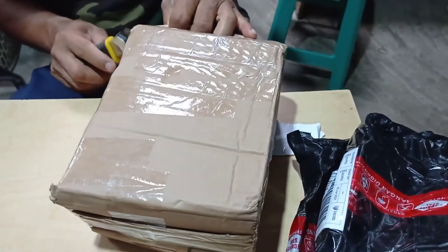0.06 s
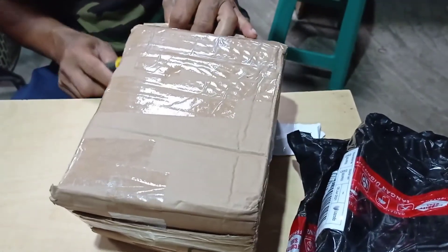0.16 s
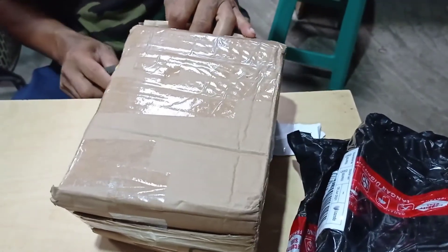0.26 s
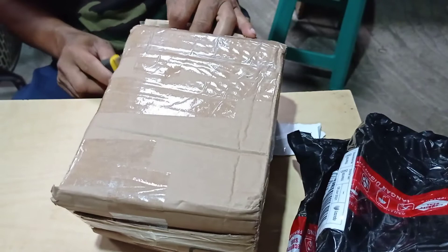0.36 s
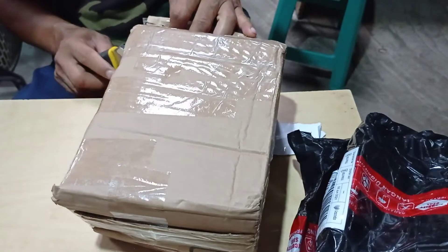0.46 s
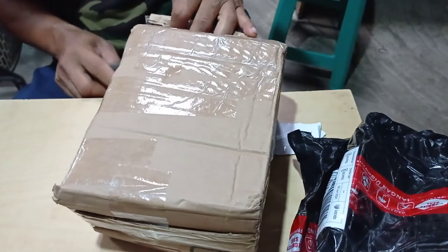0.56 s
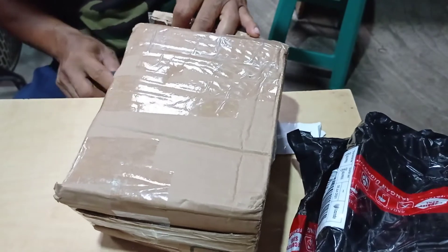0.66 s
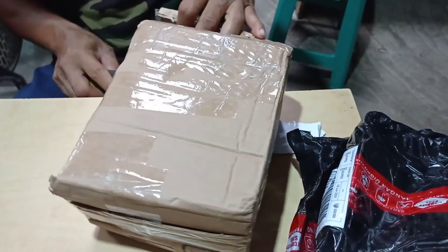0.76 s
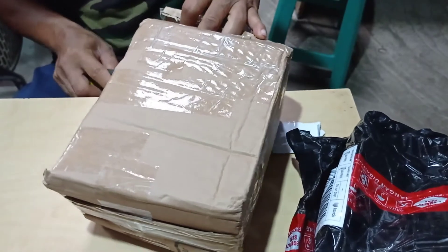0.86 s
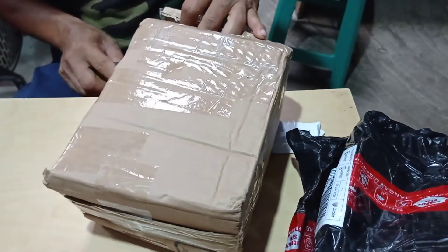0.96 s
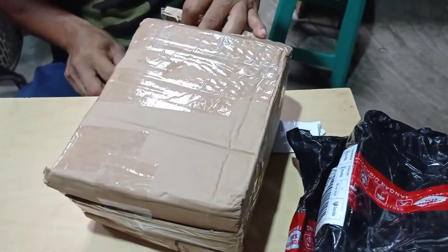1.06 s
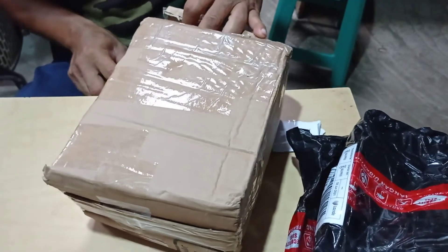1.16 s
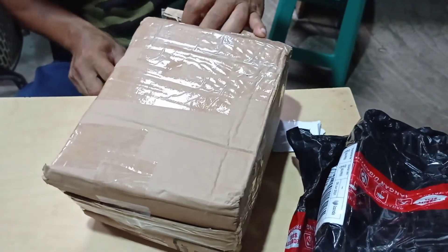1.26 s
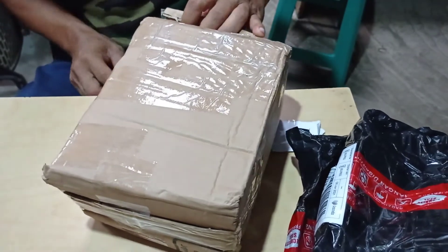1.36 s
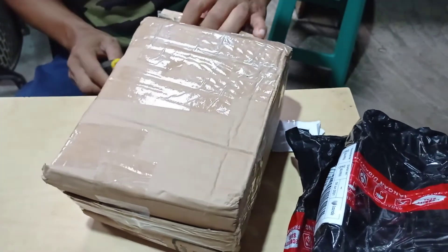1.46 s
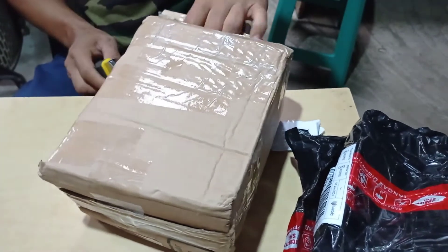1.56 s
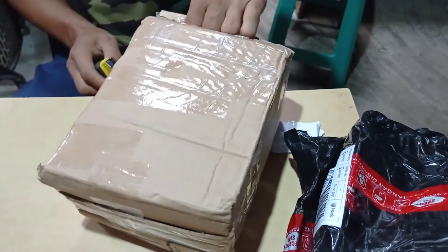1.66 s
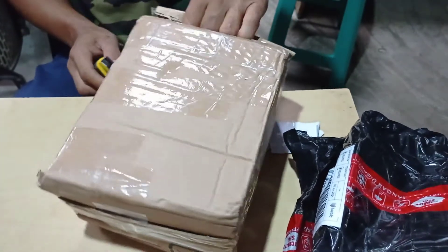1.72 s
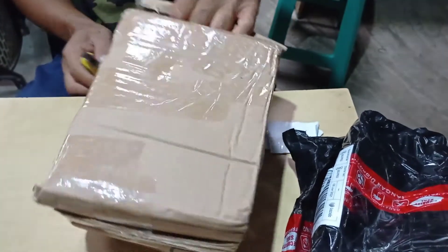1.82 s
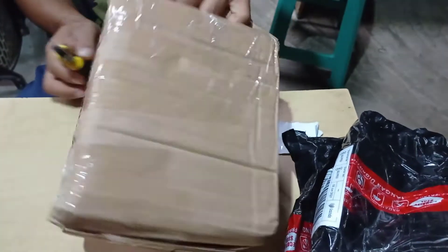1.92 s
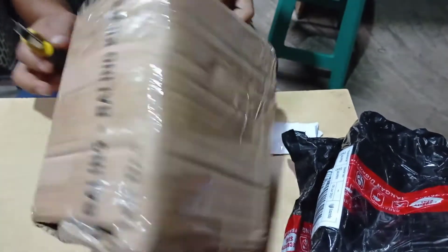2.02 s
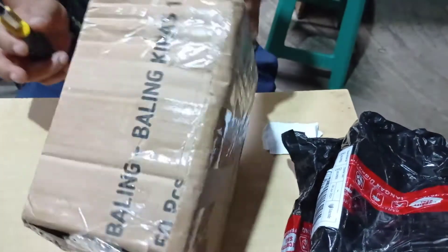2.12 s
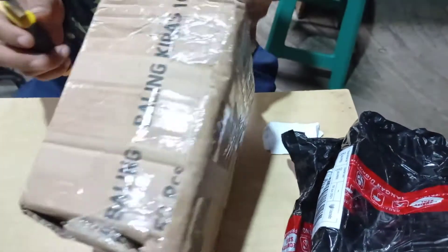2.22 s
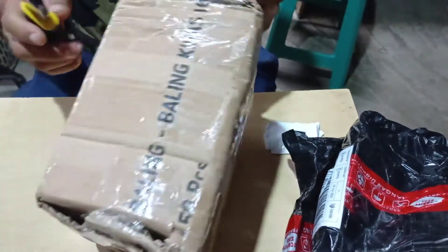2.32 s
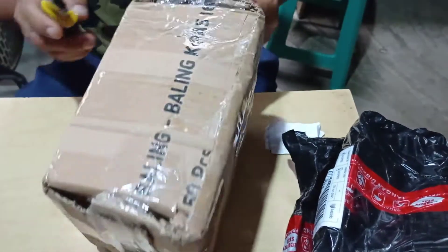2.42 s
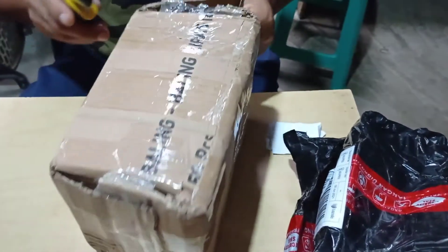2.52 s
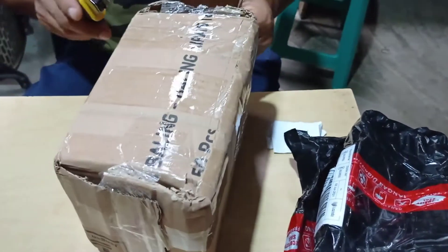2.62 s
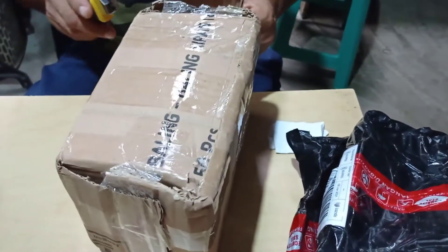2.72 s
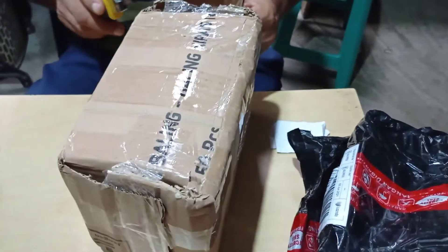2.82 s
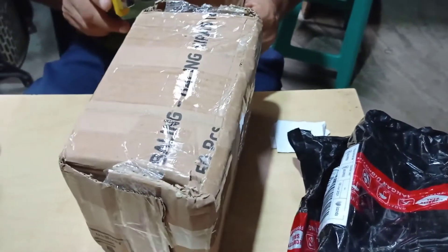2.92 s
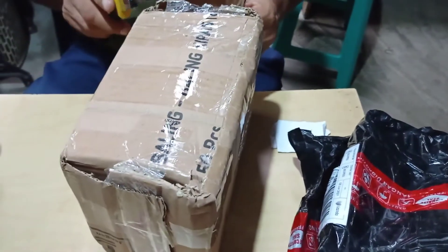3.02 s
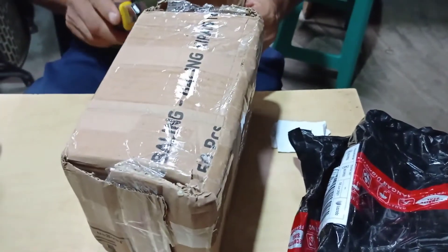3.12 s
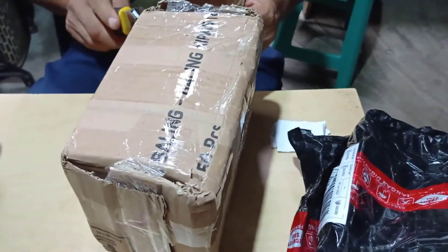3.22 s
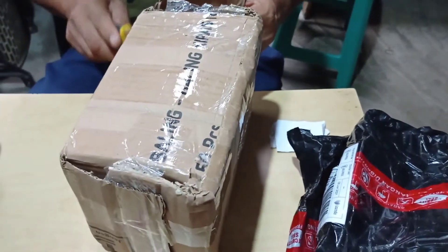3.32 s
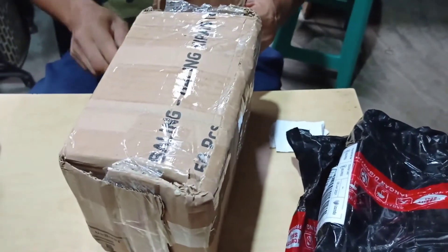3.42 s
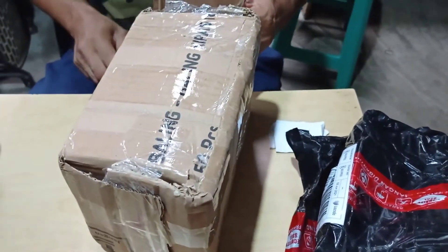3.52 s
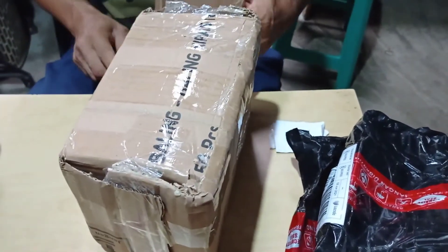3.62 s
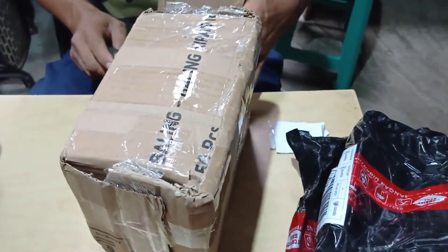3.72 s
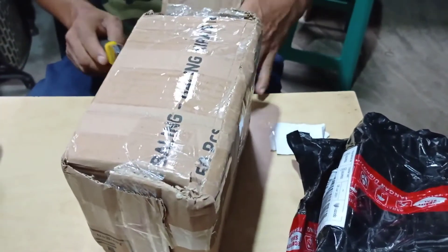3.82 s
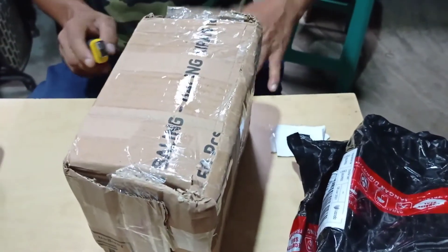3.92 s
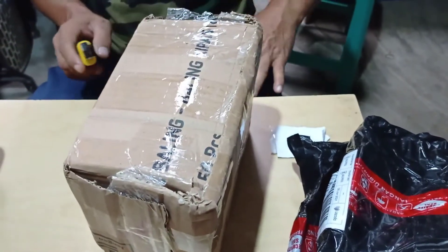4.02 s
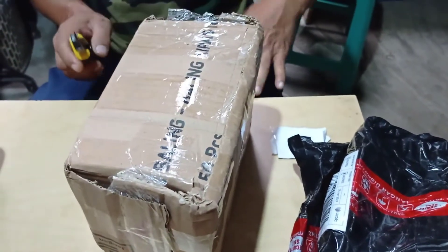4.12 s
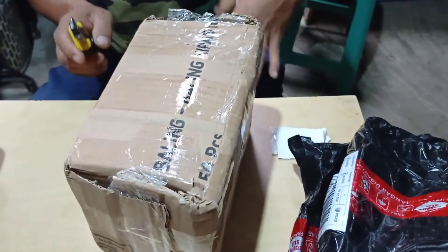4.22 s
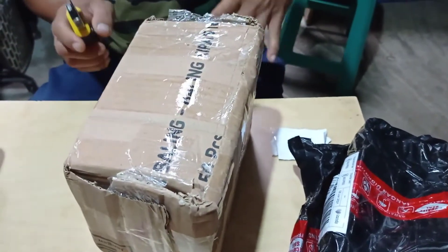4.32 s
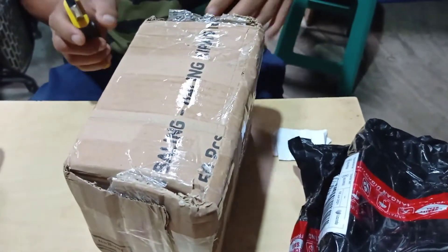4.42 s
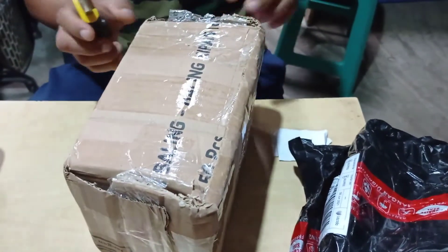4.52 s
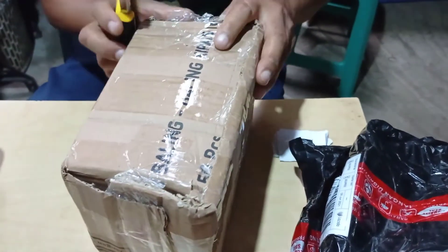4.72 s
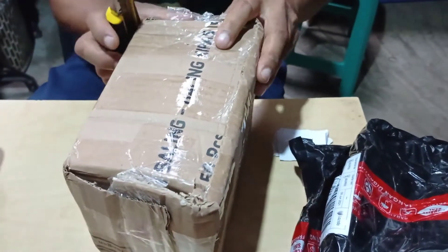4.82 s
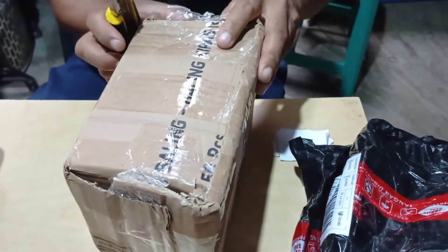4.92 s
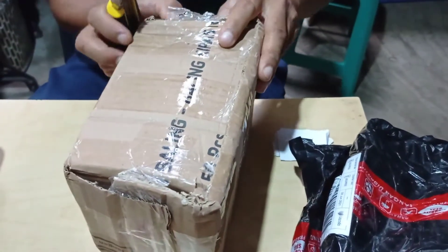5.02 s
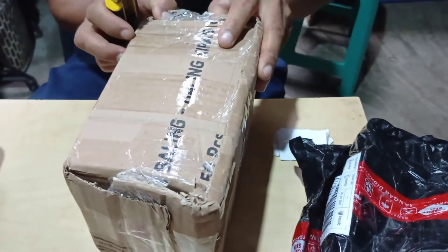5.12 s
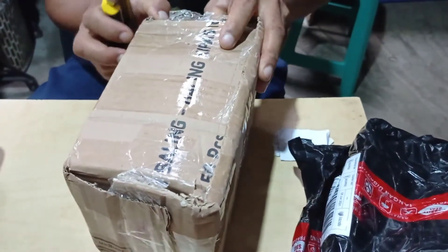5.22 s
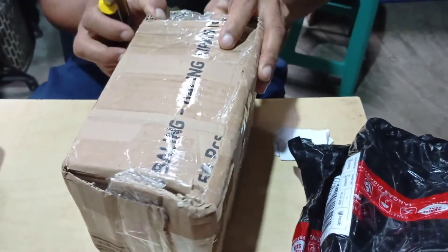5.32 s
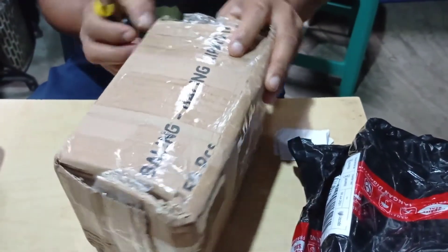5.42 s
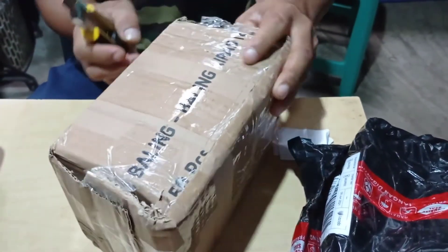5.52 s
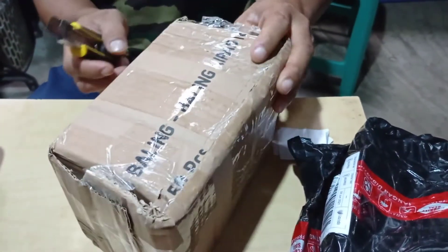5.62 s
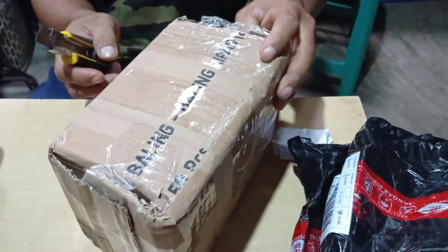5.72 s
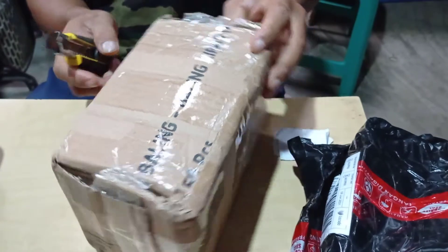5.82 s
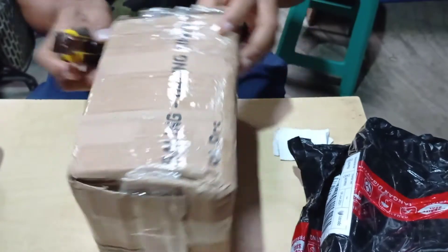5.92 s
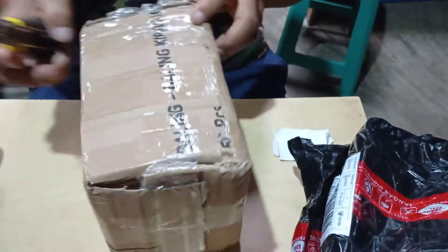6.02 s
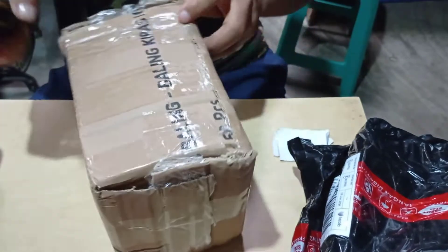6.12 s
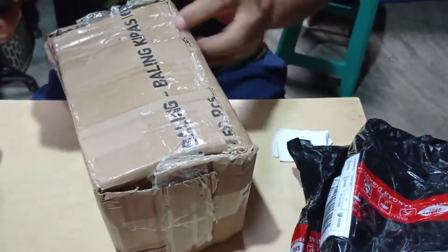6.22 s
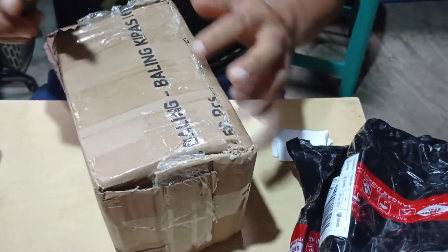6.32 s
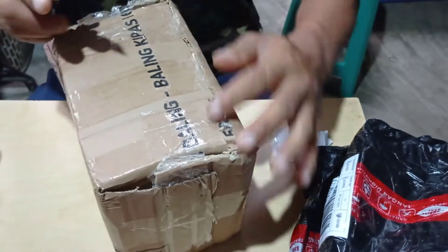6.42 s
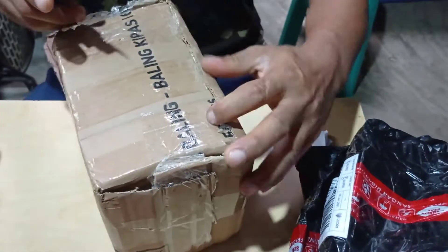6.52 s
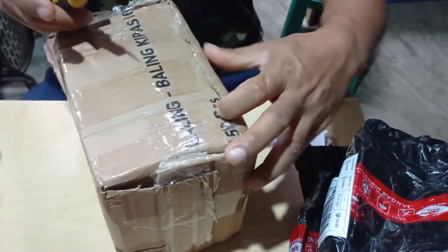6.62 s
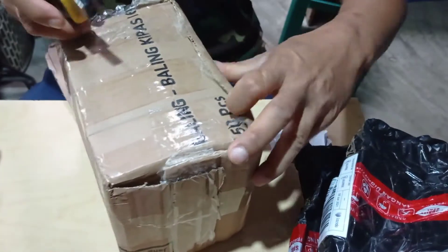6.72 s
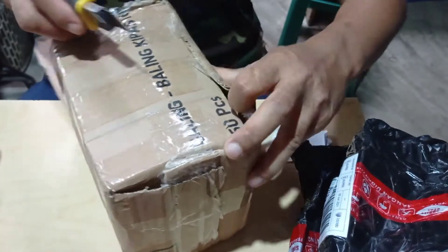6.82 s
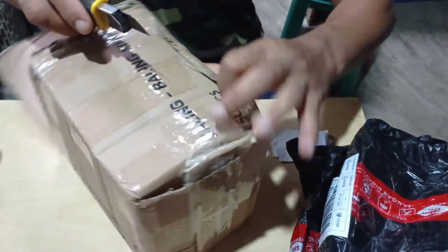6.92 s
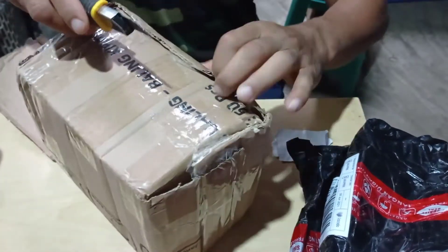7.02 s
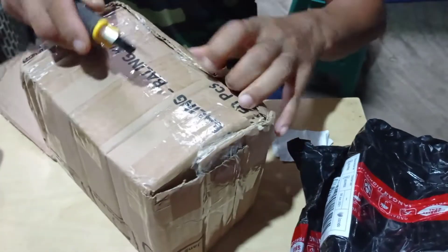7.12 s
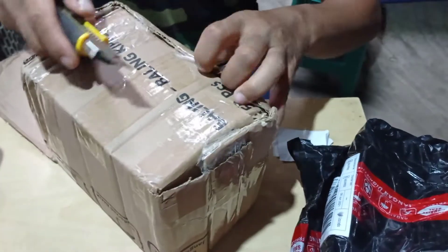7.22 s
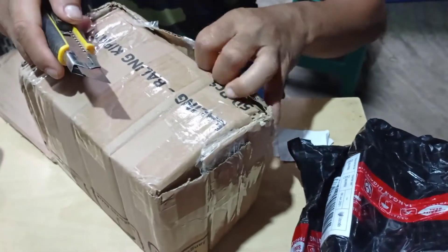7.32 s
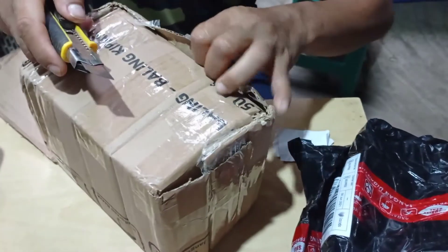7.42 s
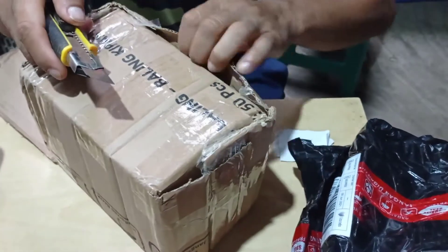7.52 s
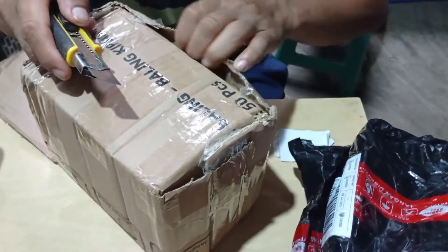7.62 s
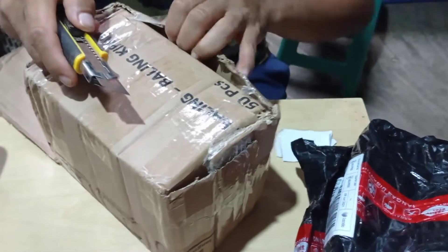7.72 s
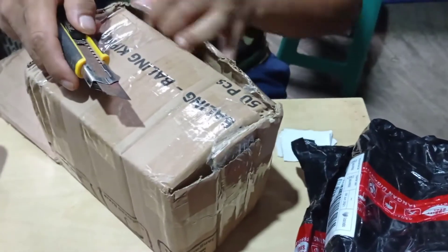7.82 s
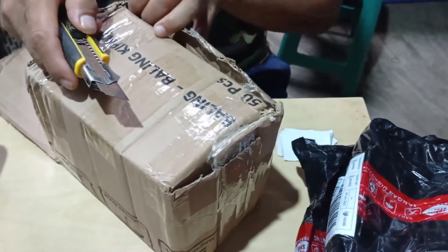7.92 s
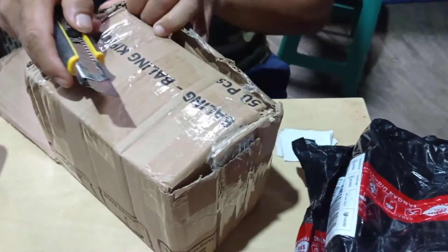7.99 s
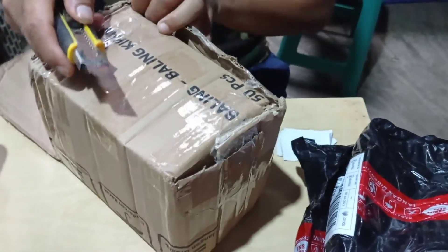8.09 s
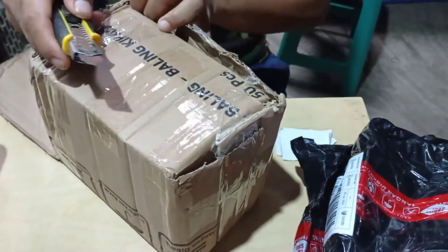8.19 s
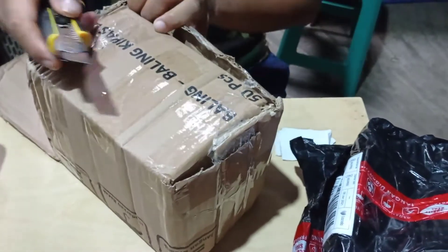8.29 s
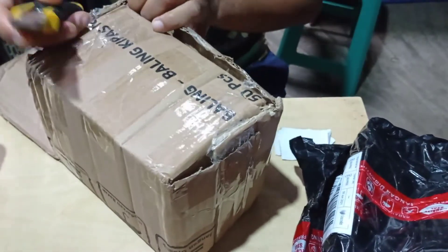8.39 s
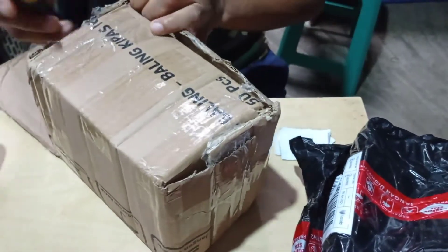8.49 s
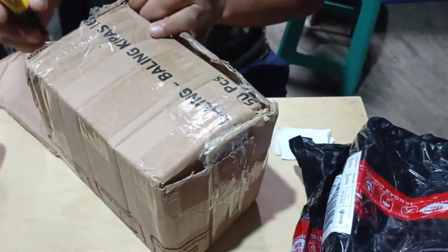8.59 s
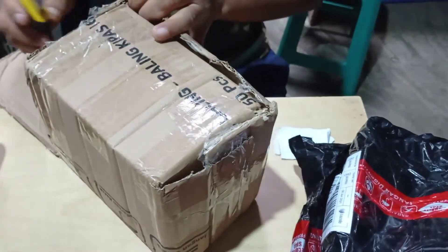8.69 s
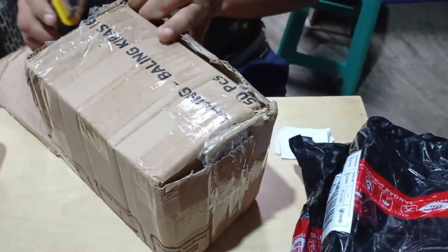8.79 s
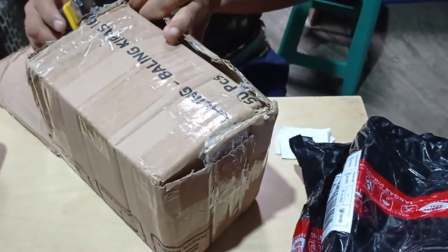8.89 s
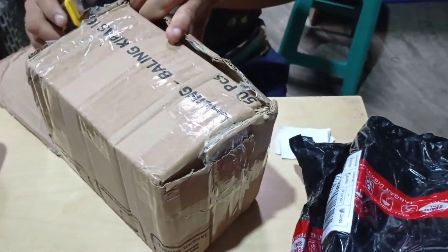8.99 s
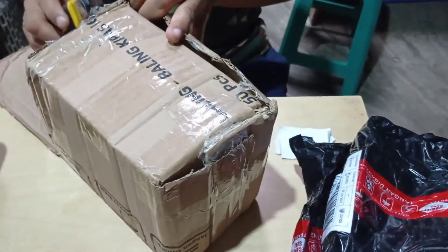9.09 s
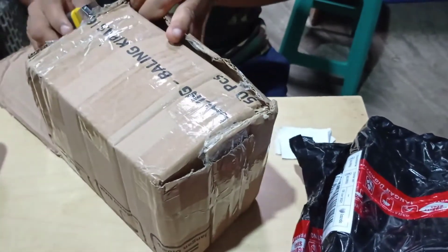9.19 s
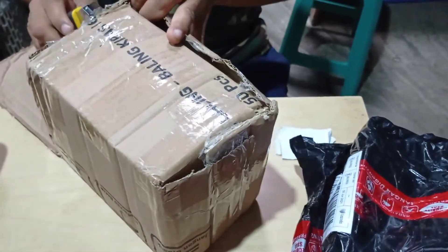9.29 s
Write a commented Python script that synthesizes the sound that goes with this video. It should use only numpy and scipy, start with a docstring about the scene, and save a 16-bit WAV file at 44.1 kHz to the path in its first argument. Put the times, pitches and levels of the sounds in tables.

```python
"""Cutting open a wrapped box

A taped, film-wrapped cardboard box is turned on a table and worked open with a utility knife.
Rubbing is filtered noise and random slips; creases, tape and card give way in short noise bursts.
Damped swings make the knocks; harmonics of the slip rate make the blade's groan.
A small hard room answers each sound with decaying noise, over a quiet floor with a thin whine."""
import sys
import numpy as np
from scipy import signal
from scipy.fft import rfft, irfft
from scipy.io import wavfile
from scipy.ndimage import uniform_filter1d

SR = 44100
rng = np.random.default_rng(int(sys.argv[2]) if len(sys.argv) > 2 else 0)


def unload_audio(sound):
    """Save the sound as a 16-bit wav file, at the path given as the first command line argument."""
    columns = np.transpose(np.atleast_2d(sound))
    # keep every value between -1 and 1, then stretch to whole-number steps
    steps = np.round(np.clip(columns, -1, 1) * 32767)
    wavfile.write(sys.argv[1], SR, steps.astype(np.int16))


N = 412335


def amp(db):
    """Decibels to gain."""
    return 10 ** (np.asarray(db) / 20)


def evened(x):
    """Scales to rms 1."""
    return x / np.sqrt(np.mean(x ** 2) + 1e-20)


def read(points, hz, column=1):
    """Reads a table on a log-frequency axis."""
    rows = np.array(points)
    return np.interp(np.log(hz + 1), np.log(rows[:, 0] + 1), rows[:, column])


def add(mix, start_s, sound):
    """Mixes a sound in at a time."""
    part = mix[max(round(start_s * SR), 0):][:len(sound)]
    part += sound[:len(part)]


def response(points, size=2048):
    """The causal, minimum-phase ring of a part that has this spectrum."""
    log_gain = np.log(amp(read(points, abs(np.fft.fftfreq(size, 1 / SR)))))
    spectrum = np.exp(np.conj(signal.hilbert(log_gain)))
    return np.fft.ifft(spectrum).real[:size // 2]


def through(x, ring):
    """Plays a force through a ring."""
    return signal.oaconvolve(x, ring)[:len(x)]


def resonate(x, hz, width_hz):
    """A one-pole complex resonance of gain 1."""
    pole = np.exp((2j * np.pi * hz - np.pi * width_hz) / SR)
    return 2 * signal.lfilter([1 - abs(pole)], [1, -pole], x).real


def resonate_twice(x, hz, width_hz):
    """Two equal resonances in series, for steeper skirts."""
    return resonate(resonate(x, hz, width_hz), hz, width_hz)


BLOW_S = .005  # a blow's level is its energy spread over this time


def blow(sound, db):
    """Gives one short sound its level."""
    return amp(db) * sound * np.sqrt(BLOW_S * SR / (np.sum(sound ** 2) + 1e-20))


def strokes(rows, column, attack_share=0.3, release_s=0.017):
    """Force of a series of strokes: each builds over a share of its length, holds and dies away."""
    out = np.zeros(N)
    for row in rows:
        start_s, length_s = row[:2]
        t = np.arange(0, length_s + 10 * release_s, 1 / SR)
        build = np.minimum(t / (attack_share * length_s), 1)
        release = np.exp(-np.maximum(t - length_s, 0) / release_s)
        add(out, start_s, amp(row[column]) * build * release)
    return out


# Spectrum of the floor. Each row: frequency in Hz, relative level in dB.
FLOOR_SPECTRUM = [(25, -15), (50, -2), (130, 3), (350, -2.5), (800, -16.5), (6200, -28.5), (13000, -50)]


def background(floor_db=-73.5, whine_db=-81.5, whine_hz=6130, width_hz=110):
    """Shaped noise makes the low floor; a narrow noise band makes a faint, fuzzy whine."""
    hz = np.fft.rfftfreq(N, 1 / SR)
    air, whine = rfft(rng.standard_normal((2, N)))
    air = irfft(air * amp(read(FLOOR_SPECTRUM, hz)), N)
    whine = irfft(whine / (1 + ((hz - whine_hz) / width_hz) ** 2), N)
    return amp(floor_db) * evened(air) + amp(whine_db) * evened(whine)


# The room's decay. Each row: frequency in Hz, t60 in seconds, relative tail energy in dB.
ROOM_DECAY = [(151, 0.36, 1.5), (497, 0.32, -7), (2800, 0.3, -3.5), (15040, 0.33, -10)]


def room(x, gap_s=.003, build_s=0.00092, count=12, return_db=-1.5):
    """Dense reflections die band by band; random tails crossfade evenly through the scene."""
    out, place = np.zeros(N), np.linspace(0, count - 1, N)
    for k in range(count):
        hz, t, z = signal.stft(rng.standard_normal(SR // 2), SR, nperseg=256)
        rate = np.log(1000) / read(ROOM_DECAY, hz)[:, None]
        level = amp(read(ROOM_DECAY, hz, column=2))[:, None]
        z = z * level * np.exp(-rate * t) * np.sqrt(2 * rate / SR)
        tail = signal.istft(z, SR, nperseg=256)[1]
        tail = tail * (1 - np.exp(-np.arange(len(tail)) / (SR * build_s)))
        share = np.sqrt(np.maximum(1 - abs(place - k), 0))
        add(out, gap_s, through(x * share, tail))
    return amp(return_db) * out


# Modes of hollow box and table top. Each row: frequency in Hz, t60 in seconds, gain in dB.
HOLLOW_MODES = [(145, 0.13, 3), (197.4, 0.19, 3.5), (352.2, 0.064, -6)]


def hollow(x):
    """The air in the box and the table under it ring on after every push."""
    return sum(amp(db) * resonate(x, hz, np.log(1000) / np.pi / t60_s) for hz, t60_s, db in HOLLOW_MODES)


# Faces the box is turned to; it hardly touches the table on the first turn.
# Each row: start in seconds, panel pitch in Hz, jolt and shake gain in dB, hollow middle gain in dB.
FACES = [(0, 334, -2.5, 2), (1.6, 386, -16, -4), (2.55, 304, -1, -1.5), (6.1, 471, -1, 1)]


def posed(column):
    """A gain that changes as the box is turned from face to face."""
    rows = np.array(FACES)
    return amp(rows[:, column])[np.searchsorted(rows[1:, 0], np.arange(N) / SR)]


def facing(x, low_hz=560, high_hz=1150):
    """The hollow middle of the sound is stronger or weaker with the face that is turned up."""
    band = signal.butter(N=2, Wn=[low_hz, high_hz], btype="band", fs=SR, output="sos")
    return x + (posed(column=3) - 1) * signal.sosfiltfilt(band, x)


def stroke(start_s, length_s):
    """One smooth stroke of the hand, from 0 up to 1 and back."""
    return np.sin(np.pi * np.clip((np.arange(N) / SR - start_s) / length_s, 0, 1))


# A palm slides evenly over taut film. Each row: start in seconds, length in seconds, peak sizzle in dB.
PALM_SLIDES = [(1.81, 0.15, -87), (3.334, 0.14, -54), (5.682, .46, -60)]


def sizzle(centre_hz=15000, width_hz=900):
    """Taut film sings at the top of hearing as it slides: a narrow noise band."""
    band = evened(resonate_twice(rng.standard_normal(N), centre_hz, 2 * width_hz))
    return band * sum(amp(db) * stroke(s, length_s) ** 2 for s, length_s, db in PALM_SLIDES)


def catching():
    """1 where the hand catches on creases, near 0 in the middle of an even slide."""
    return np.clip(1 - 0.96 * sum(stroke(s, length_s) for s, length_s, _ in PALM_SLIDES), 0, 1)


# The blade sticks and slips along the side. Each row: time in seconds, slips per second,
# relative groan level in dB, relative panel buzz level in dB, buzz pitch in Hz.
STICK_SLIP = [(0.34, 84, -51, -69, 370), (0.418, 77, -54, -61, 440), (0.57, 75, -54, -61, 510),
              (0.66, 58, -55.5, -60.5, 410), (0.76, 49.4, -57.5, -61.5, 510), (0.819, 50, -58, -71, 317),
              (0.86, 54, -54, -73, 316), (0.94, 49.6, -53.5, -73, 342), (1.015, 43, -67, -68, 481)]


def slip_turns():
    """Counts the slips of the blade through the long cut."""
    s, per_s = np.transpose(STICK_SLIP)[:2]
    return np.cumsum(np.interp(np.arange(N) / SR, s, per_s, left=0, right=0)) / SR


# How readily the side of the box sways. Each row: frequency in Hz, gain in dB.
SIDE_SWAY = [(50, -27.5), (75, -6.5), (105, -14.5), (150, 0), (210, -6), (550, -36)]


def groan(width_hz=55, waver_db=5.0, waver_step_s=.018, count=12):
    """Each slip tugs the side into a low, gliding groan; the panel buzzes at a pitch that moves."""
    s, per_s, groan_db, buzz_db, buzz_hz = np.transpose(STICK_SLIP)
    t, out = np.arange(s[0], s[-1], 1 / SR), np.zeros(N)
    turns = slip_turns()[round(s[0] * SR):][:len(t)]
    slip_hz = np.interp(t, s, per_s)
    cutting = np.minimum(10 * np.sin(np.linspace(0, np.pi, len(t))), 1)
    knots = np.arange(s[0], s[-1], waver_step_s)
    for k in range(1, count + 1):
        sway = amp(np.interp(t, s, groan_db) + read(SIDE_SWAY, k * slip_hz))
        detune = (k * slip_hz - np.interp(t, s, buzz_hz)) / width_hz
        buzz = amp(np.interp(t, s, buzz_db)) / (1 + detune ** 2)
        waver = evened(amp(waver_db * np.interp(t, knots, rng.standard_normal(len(knots)))))
        add(out, s[0], cutting * waver * (sway + buzz) * np.sin(2 * np.pi * k * turns))
    return out


# Ringing modes of the knife. Each row: frequency in Hz, relative level in dB.
BLADE_MODES = [(1090, -13), (2070, -2.5), (4730, 2.5), (7150, 3)]


def blade(x, width_hz=260):
    """The ring of the knife: each mode is a broad resonance followed by a fixed-width one."""
    return sum(amp(db) * evened(resonate(resonate(x, hz, hz / 8), hz, width_hz)) for hz, db in BLADE_MODES)


# The blade chatters late in the long cut. One row: start in seconds, length in seconds, relative level in dB.
BLADE_CHATTER = (.89, 0.11, -68.5)


def chatter(catch_s=0.0046):
    """Towards the end of the cut each slip also rings the thin blade, ever harder."""
    start_s, length_s, db = BLADE_CHATTER
    t = np.arange(0, length_s, 1 / SR)
    slips = np.diff(np.floor(slip_turns()), prepend=0)[round(start_s * SR):][:len(t)]
    catches = through(slips, np.exp(-t / catch_s)) * rng.standard_normal(len(t))
    out = np.zeros(N)
    add(out, start_s, amp(db) * evened(blade(catches * np.sqrt(t / length_s))))
    return out


# The knife shifts in the grip. Each row: start in seconds, length in seconds, relative level in dB.
GRIP_SHIFTS = [(4.348, 0.013, -58.5), (9.04, 0.038, -75), (9.118, 0.0074, -62)]


def knife(ring_gain=0.62):
    """The knife shifting in the grip: noise through the blade's ring and the film's spectrum."""
    noise = rng.standard_normal(N)
    scrape = evened(through(noise, response(FILM_SPECTRUM)))
    return strokes(GRIP_SHIFTS, column=2) * (ring_gain * evened(blade(noise)) + scrape)


# Dents in the card popping in or out. Each row: start in seconds, level in dB, pitch in Hz.
DENT_POPS = [(0.162, -32, 690), (0.286, -48.5, 1350), (0.312, -52.5, 1300), (1.277, -39.5, 1285),
             (1.954, -45, 1430), (3.137, -47, 1430), (3.547, -49.5, 1430), (4.196, -53, 2270),
             (8.982, -61, 1380)]


def dents(pop_s=.0015, damping=0.14, size=1024):
    """A dent pops with a short, hollow tick of its own pitch."""
    out, t = np.zeros(N), np.arange(size) / SR
    for (s, db, hz), grit in zip(DENT_POPS, rng.standard_normal((len(DENT_POPS), size))):
        add(out, s, blow(resonate_twice(grit * np.exp(-t / pop_s), hz, damping * hz), db))
    return out


# Strokes of hand and blade over the box.
# Each row: start in seconds, length in seconds, film force in dB, card force in dB.
RUB_STROKES = [(0.062, .06, -44.5, -40.5), (0.138, .05, -43.5, -41.5), (0.26, 0.22, -66.5, -60),
               (0.7, 0.098, -63.5, -60.5), (1.03, 0.095, -68.5, -58), (1.17, 0.082, -67, -60.5),
               (1.26, 0.03, -56, -52), (1.48, 0.1, -59.5, -58.5), (1.67, 0.062, -56.5, -57.5),
               (1.8, 0.37, -51, -53.5), (2.15, 0.25, -64, -60), (2.39, 0.17, -56.5, -53),
               (3.1, 0.14, -58.5, -52.5), (3.235, 0.1, -46, -38.5), (3.365, 0.087, -40, -38),
               (3.45, 0.12, -61.5, -54.5), (3.66, 0.12, -59.5, -59.5), (3.8, 0.087, -57, -56),
               (3.94, 0.078, -57, -59), (4.14, 0.11, -56.5, -55.5), (4.65, 0.05, -53, -52),
               (4.73, 0.083, -59, -61.5), (5.28, 0.054, -56.5, -53), (5.37, 0.042, -48.5, -46),
               (5.42, 0.083, -53, -60), (5.73, 0.3, -52.5, -53.5), (6.01, 0.17, -52, -64.5),
               (6.24, 0.031, -50.5, -52.5), (6.435, 0.052, -50, -50.5), (6.53, 0.25, -57, -56),
               (6.81, 0.14, -49.5, -48), (6.93, 0.21, -54, -51.5), (7.18, 0.041, -55, -51.5),
               (7.28, 0.21, -55.5, -54), (7.43, 0.36, -53, -57), (7.8, 0.073, -46, -63),
               (7.96, 0.17, -64, -59), (8.18, 0.18, -63.5, -62), (8.405, 0.026, -55, -54.5),
               (8.6, 0.055, -65.5, -77), (9.11, 0.03, -66, -62), (9.32, 0.063, -69, -69)]
# Hands never quite at rest on the wrap as they hold the box.
# Each row: start in seconds, length in seconds, film force in dB, card force in dB.
RESTLESS_HOLDS = [(1.46, 1.17, -62.5, -63), (3.1, 1.03, -66.5, -70.5), (4.66, 3.825, -66.5, -65.5)]


def rubbing(column):
    """How hard the film (column 2) or the card (column 3) is rubbed."""
    holds = strokes(RESTLESS_HOLDS, column, attack_share=0.0065, release_s=0.081)
    return np.hypot(strokes(RUB_STROKES, column), holds)


def friction(pressure, spectrum, per_s, spread_db, smooth, clump_db, level_db, merge_db=-50):
    """Uneven slips in clumps over a sliding hiss ring one part; a firm stroke runs them together."""
    sizes = amp(spread_db * np.minimum(rng.exponential(1, N), 3))
    slips = sizes * rng.choice([-1, 1], N) * (rng.random(N) < per_s / SR)
    clumps = evened(uniform_filter1d(uniform_filter1d(rng.standard_normal(N), size=300), size=200))
    grip = catching() / np.hypot(1, pressure / amp(merge_db))
    force = (grip * evened(slips) + smooth * rng.standard_normal(N)) / np.hypot(grip, smooth)
    clumped = force * amp(clump_db * grip * clumps)
    return pressure * amp(level_db) * evened(through(clumped, response(spectrum)))


def widening(x, pressure, low_hz, high_hz, even_db, growth, most_db):
    """A light touch sounds mostly the middle of a part's range; pressing harder brings out the rest."""
    band = signal.butter(N=3, Wn=[low_hz, high_hz], btype="band", fs=SR, output="sos")
    core = signal.sosfiltfilt(band, x)
    return core + (x - core) * np.minimum((pressure / amp(even_db)) ** growth, amp(most_db))


def crinkle(pressure, low_hz, high_hz, per_s, pop_s, level_db,
            spread_db=13.5, limit_db=-57.0, count=12, size=512):
    """Creases buckle in dry, broad ticks of a dozen colours; the driving force saturates."""
    out, t = np.zeros(N), np.arange(size) / SR
    force = amp(limit_db) * np.tanh((pressure / amp(limit_db)) ** 2) * catching()
    for hz in np.geomspace(low_hz, high_hz, count):
        band = signal.butter(N=2, Wn=[.65 * hz, 1.35 * hz], btype="band", fs=SR, output="sos")
        pop = evened(signal.sosfilt(band, rng.standard_normal(size) * np.exp(-t / pop_s)))
        sizes = amp(spread_db * np.minimum(rng.exponential(1, N), 2))
        out += through((rng.random(N) < per_s / count / SR) * sizes, pop)
    return amp(level_db) * force * evened(out)


def patchy(x, depth_db, span_hz, span_s, size=512):
    """Random patches of gain over time and frequency make the rubbing's colour uneven."""
    hop = size // 4
    z = signal.stft(x, SR, nperseg=size, noverlap=size - hop)[2]
    bins, frames = round(span_hz * size / SR), round(span_s * SR / hop)
    patches = uniform_filter1d(rng.standard_normal(z.shape), bins, 0)
    patches = evened(uniform_filter1d(patches, frames, 1))
    return signal.istft(z * evened(amp(depth_db * patches)), SR, nperseg=size, noverlap=size - hop)[1][:N]


# What the film radiates. Each row: frequency in Hz, gain in dB.
FILM_SPECTRUM = [(1800, -29), (3200, -11), (4600, -3), (6400, 1.5), (7600, -3.5), (10000, -12),
                 (13300, -24.5), (15200, -11), (16500, -29)]


def film_rustle(pressure):
    """Rubbed film: hiss that widens with pressure, and bright crinkles."""
    hiss = friction(pressure, FILM_SPECTRUM, per_s=330, spread_db=5.0, smooth=1.0, clump_db=1.5, level_db=0.0)
    hiss = widening(hiss, pressure, low_hz=1200, high_hz=10000, even_db=-52.5, growth=.4, most_db=-1)
    hiss = hiss + crinkle(pressure, low_hz=4500, high_hz=7000, per_s=80, pop_s=.0005, level_db=-4.5)
    return patchy(hiss, depth_db=4.0, span_hz=1400, span_s=0.027)


# What the card radiates. Each row: frequency in Hz, gain in dB.
CARD_SPECTRUM = [(250, -26.5), (550, -3.5), (800, 4), (1100, -2), (1400, 3.5), (1700, 1), (2100, 3),
                 (3000, -6.5), (4200, -25), (8000, -36.5)]


def card_scrape(pressure):
    """Rubbed card: a lower scrape that widens with pressure, and duller crinkles."""
    scrape = friction(pressure, CARD_SPECTRUM, per_s=360, spread_db=2.5, smooth=0.83,
                      clump_db=1.0, level_db=-3.0)
    scrape = widening(scrape, pressure, low_hz=1092, high_hz=7000, even_db=-56.5, growth=0.22, most_db=-0.5)
    scrape = scrape + crinkle(pressure, low_hz=1400, high_hz=2800, per_s=70, pop_s=.0006, level_db=-4.5)
    return patchy(scrape, depth_db=3.5, span_hz=297.0, span_s=0.029)


def drumming(pressure, panel_hz=375, width_hz=190, level_db=-9):
    """Dragging fingers drum the panel beneath them at its own pitch."""
    tugs = rng.standard_normal(N) * (rng.random(N) < width_hz / SR)
    return pressure * amp(level_db) * evened(resonate_twice(tugs, panel_hz, width_hz))


# What the panels radiate. Each row: frequency in Hz, gain in dB.
PANEL_SPECTRUM = [(35, -50.5), (75, -10.5), (150, -5), (350, 0.5), (650, -5), (1200, -20), (3000, -64)]
# The box shoved over the table. Each row: start in seconds, length in seconds, force in dB.
TABLE_SHOVES = [(0.05, .14, -41), (0.45, 0.05, -44), (1.02, 0.034, -46.5), (1.45, 0.22, -62),
                (2.52, 0.12, -56.5), (3.22, 0.19, -52.5), (4.67, 0.038, -34.5), (4.96, 0.081, -50),
                (5.1, 0.032, -36.5), (6.23, 0.056, -43), (6.44, 0.041, -48), (8.2, 0.063, -48.5),
                (9.28, 0.097, -58.5)]


def panel_rumble(card_pressure, shake_db=-7):
    """Shoves over the table and rubbing of the card shake the panels into a rumble."""
    shoves = strokes(TABLE_SHOVES, 2, attack_share=0.19, release_s=0.0056)
    shake = amp(shake_db) * card_pressure * catching() * posed(column=2)
    return friction(np.hypot(shoves, shake), PANEL_SPECTRUM, per_s=330, spread_db=8.5, smooth=0.99,
                    clump_db=-2.5, level_db=-3.5)


# Bumps of box on table and of hands.
# Each row: start in seconds, level in dB before the trim in knocks(), settled panel pitch in Hz.
BOX_KNOCKS = [(0.047, -41.5, 185), (0.473, -35, 212), (1.043, -41.5, 465), (1.045, -44, 135),
              (2.557, -45, 450), (3.139, -45, 390), (3.391, -37.5, 295), (3.428, -24.5, 270),
              (3.453, -36.5, 218), (3.549, -43, 405), (3.68, -51.5, 318), (4.088, -55.5, 407),
              (4.689, -30.5, 370), (4.69, -42, 112), (4.987, -44, 403), (5.105, -39, 450),
              (5.125, -32, 227), (5.399, -37, 357), (5.884, -41.5, 370), (5.943, -49, 383),
              (6.237, -43, 368), (6.273, -40, 162), (6.297, -38, 148), (6.69, -46, 386),
              (7.089, -39.5, 400), (7.113, -35, 418), (7.186, -39.5, 420), (7.8, -40, 140),
              (8.205, -45, 370), (8.429, -43.5, 428)]


def knocks(ring_s=0.0044, stiffen=0.39, relax_s=0.00092, rattle=0.67, rattle_s=0.0059,
           trim_db=0.5, size=4096):
    """A struck panel swings a few damped cycles, sagging in pitch, and shakes its neighbours near it."""
    rows = BOX_KNOCKS + jolts()
    out, t, panel = np.zeros(N), np.arange(size) / SR, response(PANEL_SPECTRUM)
    for (s, db, hz), shake in zip(rows, rng.standard_normal((len(rows), size))):
        turns = np.cumsum(hz * (1 + stiffen * np.exp(-t / relax_s))) / SR
        envelope = (1 - np.exp(-t * hz * 2)) * np.exp(-t / ring_s)
        swing = np.gradient(-np.cos(2 * np.pi * turns) * envelope)
        box = resonate(through(shake * np.exp(-t / rattle_s), panel), hz, 2 * hz)
        add(out, s, blow(evened(swing) + rattle * evened(box), db + trim_db))
    return out


# before face gain and trim, a jolt equals its crack at this level and changes SLOPE dB per dB of crack
JOLT_EVEN_DB, JOLT_SLOPE, JOLT_LAG_S = -23.5, 1.44, .0015


def jolts():
    """The knock that each crack of the card gives the panel and the table under it."""
    rows = []
    for s, _, crack_db in CARD_SNAPS:
        _, hz, face_db, _ = FACES[sum(s > face[0] for face in FACES[1:])]
        jolt_db = JOLT_EVEN_DB + JOLT_SLOPE * (crack_db - JOLT_EVEN_DB) + face_db
        rows.append((s + JOLT_LAG_S, jolt_db, hz))
    return rows


# Tape and card giving way. Each row: start in seconds, film tick in dB, card crack in dB.
CARD_SNAPS = [(0.047, -38, -41), (0.067, -39.5, -45), (0.112, -37, -34.5), (0.161, -36, -27.5),
              (0.173, -35.5, -35), (0.336, -52.5, -46.5), (0.395, -46.5, -46.5), (0.453, -50.5, -46.5),
              (0.474, -52, -53), (0.597, -54, -65), (1.02, -61, -51), (1.036, -51, -44.5),
              (1.082, -38, -49), (1.098, -38.5, -69), (1.276, -50, -38), (1.432, -55.5, -64),
              (1.68, -47, -42.5), (1.694, -47.5, -48), (2.0, -48, -49), (2.026, -32.5, -37.5),
              (2.051, -30.5, -30.5), (2.111, -47, -37.5), (2.133, -42, -45.5), (2.206, -43, -41.5),
              (2.25, -46, -49.5), (2.396, -39.5, -46.5), (2.446, -50, -49), (2.522, -44, -67),
              (2.537, -43.5, -56), (2.717, -49, -54.5), (2.779, -55.5, -56), (2.842, -53, -72),
              (2.908, -60.5, -62.5), (2.987, -64, -62.5), (3.1, -46.5, -39), (3.238, -48, -34.5),
              (3.388, -29.5, -27), (3.423, -34, -32.5), (3.426, -27, -26.5), (3.612, -55, -56.5),
              (3.818, -48.5, -52.5), (3.998, -50, -57), (4.66, -50.5, -45), (4.687, -39, -42),
              (4.785, -50.5, -54), (4.81, -50, -45), (4.871, -42, -57), (4.97, -45.5, -49.5),
              (5.123, -45, -42.5), (5.254, -48, -53.5), (5.289, -49.5, -60), (5.401, -54, -46.5),
              (5.457, -47, -44.5), (5.751, -48, -57), (6.215, -47.5, -77), (6.44, -45, -46),
              (6.513, -44, -49), (6.524, -44.5, -44.5), (6.636, -48, -54), (6.699, -43.5, -59),
              (6.712, -50, -58), (6.732, -45.5, -53), (6.748, -48, -48), (6.789, -27.5, -45),
              (6.792, -22.5, -28), (6.818, -37, -45.5), (6.849, -41, -44.5), (6.89, -41.5, -49.5),
              (7.095, -41, -48), (7.107, -41, -42.5), (7.214, -46, -48), (7.2686, -20.5, -23),
              (7.439, -46, -40), (7.501, -38, -56), (7.568, -38.5, -42), (7.588, -30.5, -36.5),
              (7.673, -45.5, -52.5), (7.752, -48, -50.5), (7.794, -25, -24), (8.096, -35.5, -39),
              (8.423, -35.5, -54), (8.432, -45.5, -44), (8.523, -46.5, -66), (8.981, -47.5, -67.5),
              (9.253, -62, -78.5)]


def snaps(film_s=0.00073, card_s=0.0027, rise_s=0.00065, crumble=0.17, crumble_s=0.0039,
          bright=0.46, thin=0.24, card_lag_s=.0005, size=2048):
    """Each snap is a milliseconds-long avalanche of breaking fibres, with stragglers after it."""
    out, t = np.zeros(N), np.arange(size) / SR
    rise = 1 - np.exp(-t / rise_s)
    noises = rng.standard_normal((len(CARD_SNAPS), 3, size))
    for (s, tick_db, crack_db), (film_noise, card_noise, grit) in zip(CARD_SNAPS, noises):
        # bare film ticks brightly; film stuck down on card sounds duller (dB per octave)
        tilt_db = bright * np.clip(tick_db - crack_db - 15.5, -20, 10)
        film = response([(hz, db + tilt_db * max(np.log2(hz / 6000), 0)) for hz, db in FILM_SPECTRUM])
        # a light crack is too small to move the card's low range (dB per octave)
        thin_db = thin * min(crack_db - JOLT_EVEN_DB, 0)
        card = response([(hz, db + thin_db * max(np.log2(1400 / hz), 0)) for hz, db in CARD_SPECTRUM])
        stragglers = crumble * evened(grit ** 3) * np.exp(-t / crumble_s)
        tick = through(rise * (film_noise * np.exp(-t / film_s) + stragglers), film)
        crack = through(rise * (card_noise * np.exp(-t / card_s) + stragglers), card)
        add(out, s, blow(tick, tick_db))
        add(out, s + card_lag_s, blow(crack, crack_db))
    return out


def scene():
    """Everything the box and knife do, in the room."""
    film, card = rubbing(column=2), rubbing(column=3)
    rustle = film_rustle(film) + card_scrape(card)
    body = knocks() + panel_rumble(card) + drumming(card)
    box = facing(snaps() + rustle + body) + hollow(body) + dents()
    box = box + knife() + groan() + chatter() + sizzle()
    return (box + room(box) + background())[None]


def record(dry, edge_hz=16250):
    """Band limit: a steep linear-phase low-pass."""
    lowpass = signal.firwin(401, edge_hz, window=("kaiser", 9), fs=SR)
    return signal.oaconvolve(dry, lowpass[None], "same")


dry = scene()
out = record(dry)
unload_audio(out)
```